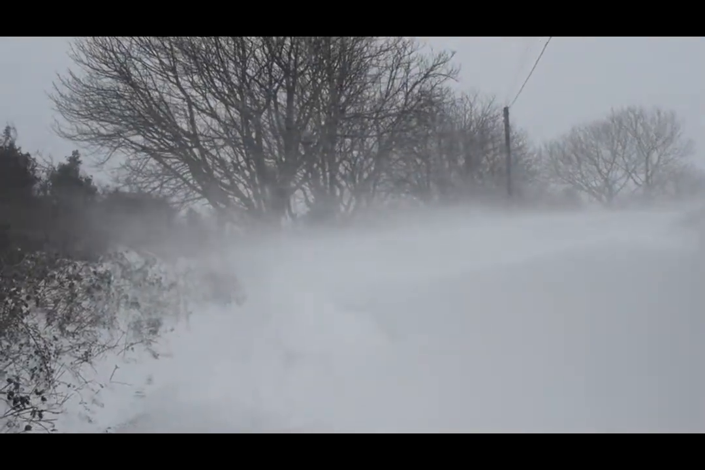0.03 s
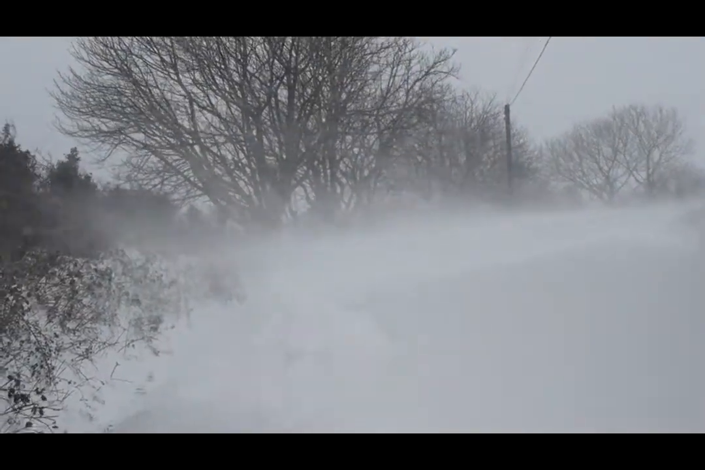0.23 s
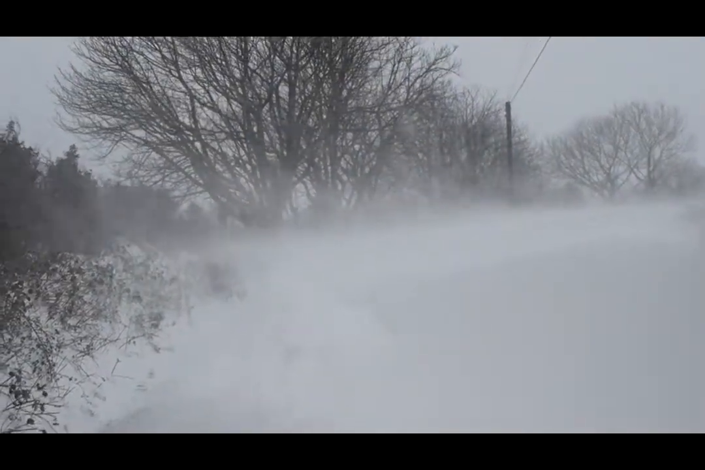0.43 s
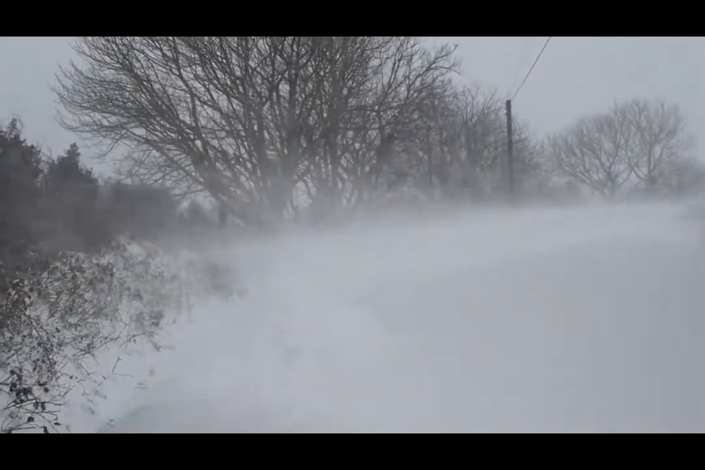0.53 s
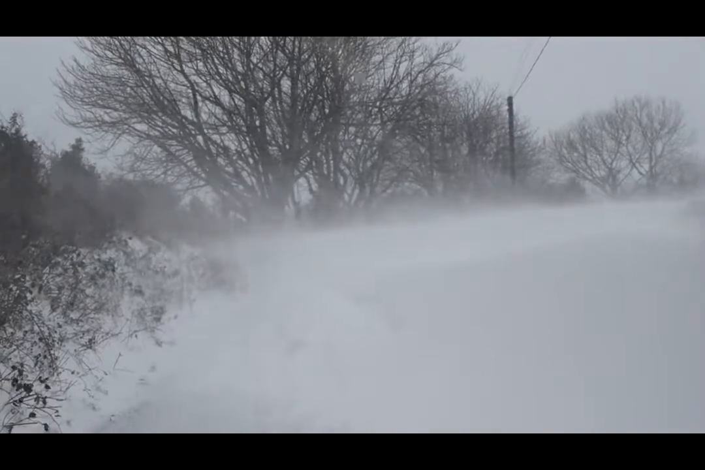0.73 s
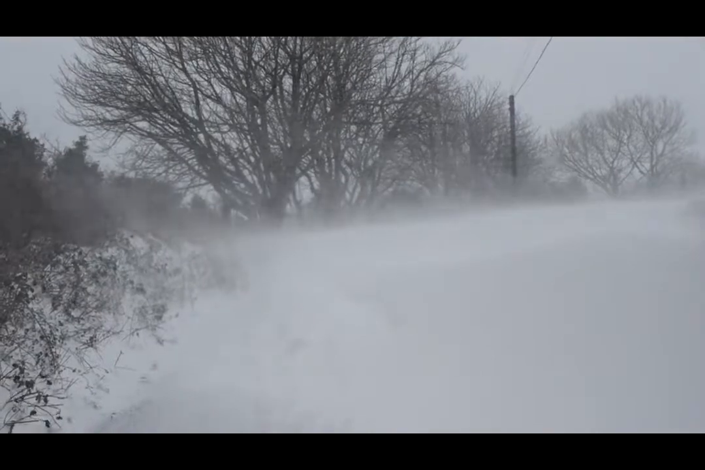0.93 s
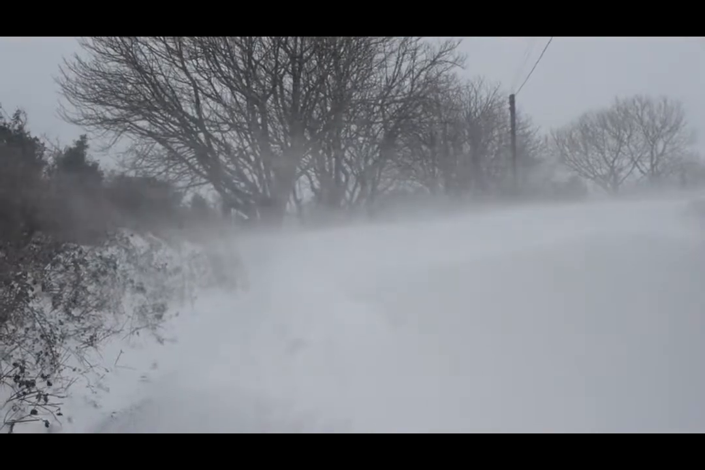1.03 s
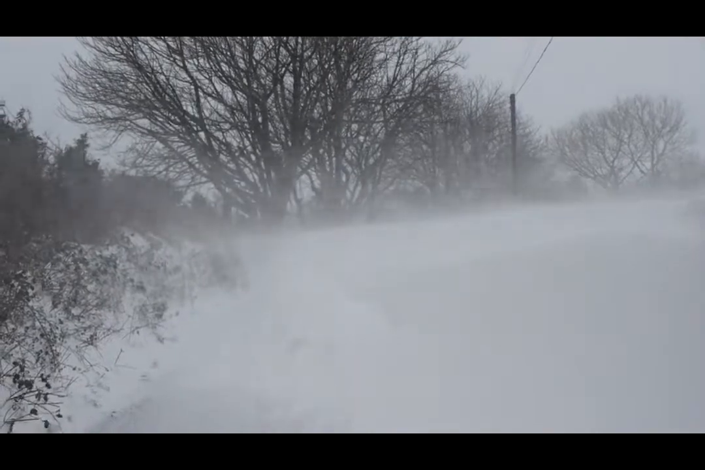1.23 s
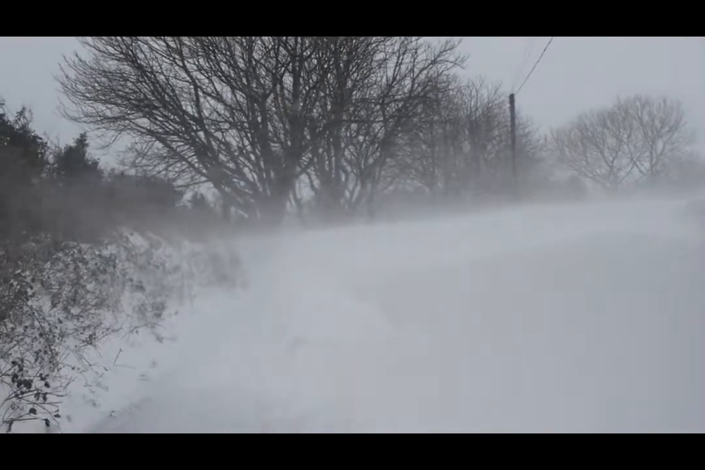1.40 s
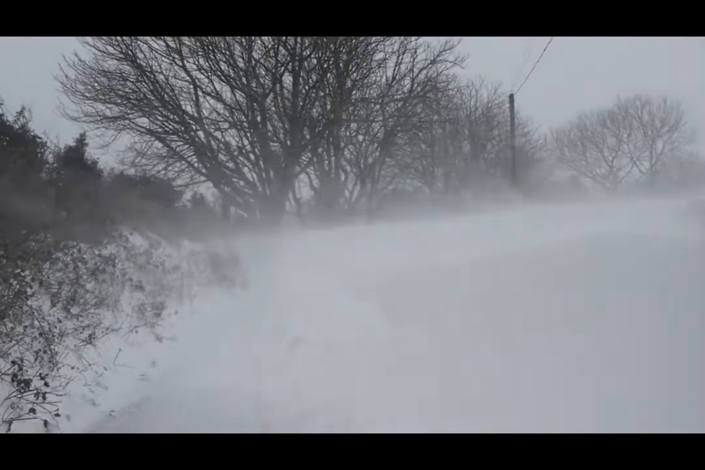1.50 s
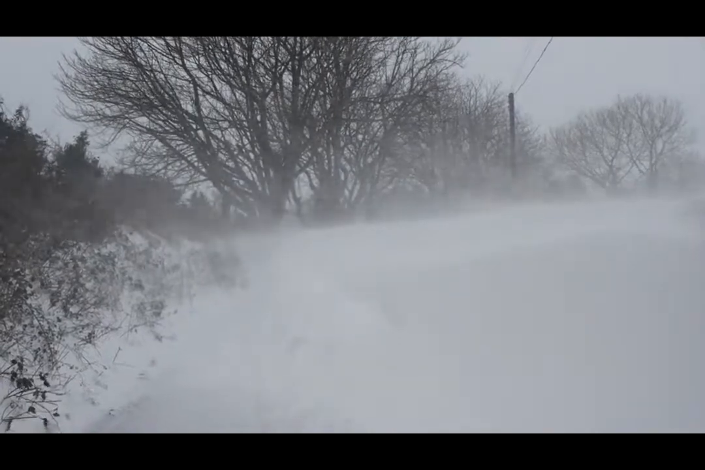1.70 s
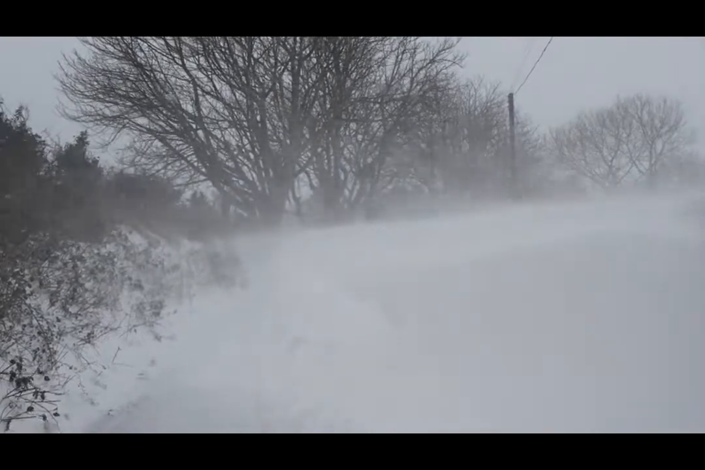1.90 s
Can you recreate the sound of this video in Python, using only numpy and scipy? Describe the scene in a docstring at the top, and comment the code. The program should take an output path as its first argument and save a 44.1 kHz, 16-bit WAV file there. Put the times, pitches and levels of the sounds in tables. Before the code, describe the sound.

Wind buffeting, harsh and distorted, slaps the right side hardest, with thin snowy hiss behind

```python
"""A snowy country road: gusts hit the two ports of a camera microphone, the right one much harder.
Banded noise makes the eddies: a rumble in a light flow, a tearing flutter that overloads in a strong one.
Damped swings slap the ports, and random impulses crack in the fastest flow.
Behind them, wind in bare trees and blowing snow hiss as coloured noise and fine ticks; the hiss sinks
through much of the gusting. Short bright noise bursts are snow spattering on the camera."""
import sys
import numpy as np
from scipy import signal
from scipy.fft import rfft, irfft
from scipy.io import wavfile
from scipy.ndimage import uniform_filter1d

SR = 44100
rng = np.random.default_rng(int(sys.argv[2]) if len(sys.argv) > 2 else 0)


def materialize(psi):
    """Save the field psi as 16-bit PCM at rate SR to the path in sys.argv[1].

    A 1-D psi becomes a single channel; in a 2-D psi each row is a channel.
    """
    bounded = np.clip(np.atleast_2d(psi).T, -1, 1)
    quanta = np.round(bounded * 32767).astype(np.int16)
    wavfile.write(sys.argv[1], SR, quanta)


N = 85995

# Shared level of the tree hiss and snow ticks: (time [s], level [dB])
HISS_LEVEL = [(0.0, -0.5), (0.12, 0.5), (0.2, 0.1), (0.287, -14), (0.391, -11.5), (0.471, -19),
              (0.543, -20.5), (0.686, -8.5), (0.806, -19), (0.942, -15.5), (1.006, -25), (1.165, -16),
              (1.429, -6.5), (1.572, -11), (1.95, -1)]
# Colour of the wind in the trees: (frequency [Hz], relative level per hertz [dB])
HISS_COLOUR = [(100, -15), (330, -6.5), (450, -9.5), (650, 0), (1000, 2), (1350, -5), (1700, -1.5),
               (2400, -10.5), (3600, -16.5), (5500, -23.5), (7000, -23.5), (8500, -20.5), (11000, -35),
               (15000, -32)]
# Colour of a snow tick: (frequency [Hz], relative level [dB])
SNOW_COLOUR = [(1000, -30), (3000, 9), (6000, -3), (8500, 2), (12000, -6), (16000, -23)]
# Spatters of snow blown against the camera: (time [s], right-port level [dB], decay [s])
SPATTERS = [(0.329, -21, 0.00093), (.384, -34.5, 0.017), (.872, -44, 0.03), (1.123, -45.5, 0.053),
            (1.328, -33.5, .002), (1.484, -40.5, 0.11), (1.508, -34, 0.0013), (1.59, -37, 0.0033)]
# Colour of a spatter: (frequency [Hz], relative level [dB])
SPATTER_COLOUR = [(1000, -25), (4000, -6.5), (8500, 3.5), (12000, -3.5), (16000, -13)]
# Colour of a pressure crack: (frequency [Hz], relative level [dB])
CRACK_COLOUR = [(300, -1), (1500, 0.5), (3000, -4.5), (5000, -9.5), (9000, -20.5), (16000, -33)]
# Airflow at each port: (time [s], pressure level before trims [dB], rate of the fastest eddies [Hz])
FLOW_LEFT = [(0.0, -38, 300), (0.295, -27.5, 280), (0.327, -18.5, 300), (0.431, -30.4, 380),
             (0.471, -44, 270), (0.535, -30.5, 280), (0.567, -49, 320), (0.592, -24.5, 383),
             (0.623, -45, 280), (0.694, -39, 240), (0.733, -24.0, 394), (0.83, -39, 340),
             (1.054, -36.5, 340), (1.133, -50.5, 220), (1.189, -41, 400), (1.245, -34.5, 300),
             (1.389, -29, 344), (1.445, -45, 220), (1.548, -21.5, 560), (1.652, -25, 604),
             (1.74, -40.5, 219), (1.765, -17, 297), (1.804, -45, 290), (1.859, -21, 326), (1.892, -36, 221),
             (1.95, -20.5, 450)]
FLOW_RIGHT = [(0, -25, 286), (0.15, -20.6, 237), (0.184, -16, 345), (0.203, 0.7, 400), (0.23, -7, 750),
              (0.246, -0.9, 1450), (0.283, -4, 1473), (0.314, -4.5, 787), (0.345, -13, 690),
              (0.362, -0.2, 1160), (0.377, -12, 1350), (0.381, -12.5, 870), (0.418, -11, 625),
              (0.426, -9, 990), (0.454, -4, 1870), (0.456, -17, 1410), (0.483, -15, 630), (0.53, -46, 250),
              (0.58, -44, 300), (0.63, -18, 330), (0.691, -23.5, 350), (0.704, -1.5, 1240),
              (0.739, -2.5, 1500), (0.789, -2, 1800), (0.795, -14, 1670), (0.812, -13.5, 970),
              (0.819, -18.5, 300), (0.853, -22, 350), (0.897, -5, 556), (0.903, -1, 990), (0.925, -6, 1450),
              (0.957, -6.5, 1250), (0.968, -21.5, 585), (1.022, -29, 242), (1.049, -16, 370),
              (1.11, -19.5, 463), (1.14, -23, 310), (1.158, -20, 447), (1.199, -29.5, 300),
              (1.27, -37, 190), (1.312, -15.5, 394), (1.333, -9, 740), (1.355, -6.5, 460),
              (1.392, -29.5, 270), (1.423, -30, 190), (1.468, -1, 600), (1.494, -10, 627),
              (1.536, -13, 463), (1.567, -5.5, 402), (1.584, -13, 363), (1.621, -14, 530),
              (1.66, -31.5, 240), (1.8, -31.5, 366), (1.9, -24.5, 286), (1.95, -32, 350)]
# Response of either port to turbulence: (frequency [Hz], gain [dB])
PORT_RESPONSE = [(20, -30), (45, -15.5), (80, -1.5), (150, 4), (250, -2.5), (380, 2.5), (480, -2.5),
                 (750, 2.5), (1050, 4), (1350, -4), (1800, 5.5), (3000, 1), (12000, -4)]
# Single sharp eddies that slap a port:
# (time [s], level [dB], central swing rate [Hz], decay [s], port [0 left, 1 right])
SLAPS = [(0.2126, 11.5, 650, 0.0035, 1), (0.2487, -2, 1700, .001, 1), (.375, 6, 1086, 0.00095, 1),
         (0.421, -2, 913, 0.0027, 1), (0.444, -6, 1597, 0.0013, 1), (0.4518, 5.5, 1895, 0.00085, 1),
         (0.641, -6, 450, 0.0018, 1), (0.7029, 0.5, 927, 0.0018, 1), (.859, -4, 458.6, 0.00088, 1),
         (0.9004, 9.5, 600.5, 0.0013, 1), (0.9586, 9.5, 1396, 0.00068, 1), (0.9883, 2, 798.6, 0.0011, 1),
         (1.051, 0, 1250, 0.0021, 1), (1.054, -0.5, 200, 0.0035, 1), (1.156, -12, 800, 0.0033, 1),
         (1.296, -5, 396.5, 0.0033, 1), (1.3321, 7.5, 700, 0.0011, 1), (1.4647, 4.5, 950, 0.0036, 1),
         (1.4898, -2, 784, 0.0011, 1), (1.524, -5.5, 950, 0.0011, 1), (1.622, -8.5, 550, 0.0023, 1),
         (1.561, -0.5, 443.7, 0.0044, 0), (1.605, -2, 500, 0.0048, 0), (1.656, -2.5, 400.6, 0.0028, 0),
         (1.684, -4.5, 250, 0.0055, 0), (1.765, -17, 203, 0.0086, 0)]

# Hiss and ticks; the levels are relative to HISS_LEVEL
HISS_LEFT_DB, HISS_RIGHT_DB = -26.5, -25.5
HISS_SAME = 0.49  # share of the noise power common to both ports, before patchiness
HISS_PATCH_DB, HISS_PATCH_HZ = 2.5, 6.1  # uneven patches in each band
SNOW_PER_S, SNOW_DB, SNOW_SPREAD_DB = 1300, -36.5, 1.5  # grains ticking on the camera

SPATTER_LEFT_DB = -4  # left port relative to the right
RISE_S = 0.00019  # onset of every spatter and slap

# Cracks
CRACKS_PER_S, CRACK_DB = 400, -3.5  # highest rate; level relative to the flow pressure
CRACK_FROM_HZ = 1050  # eddy rate at which the cracking sets in
CRACK_FULL_DB = -14  # below this pressure level the cracks thin out

# Turbulence
LEFT_DB, RIGHT_DB = 1, -1  # trims on the buffeting alone
EDDY_SHIFT = 0.81  # roll-off corner as a share of the eddy rate
EDDY_SLOPE, EDDY_KNEE = 4.98, 5.3  # exponent of the fall in power; sharpness of the corner
FLUTTER_HZ, FLUTTER_DB = 75.6, 4.5  # uneven puffs in a slow flow, before levelling
STEADY_HZ = 1400  # the puffs even out as the eddies near and pass this rate
CRACKLE_HZ, CRACKLE_DB = 270, 7  # the smallest eddies arrive in brief clumps
CRACKLE_ABOVE_HZ = 2000  # half of the clumping depth is reached here

# Slaps
SLAP_JITTER = 0.6  # rms wander of the swing rate, as a share of it
SLAP_PUSH, PUSH_S = 0.24, 0.0014  # one-sided thud: share of the slap level; decay in s

# Overload and band limit
OVERLOAD_KNEE = 24  # the higher, the harder the flattening
CUTOFF_HZ = 15700


def amp(db):
    """Decibels to gain."""
    return 10 ** (np.asarray(db) / 20)


def unit(x):
    """Scales to rms 1."""
    return x / np.sqrt(np.mean(x ** 2) + 1e-20)


def along(rows):
    """Draws each column of a timed table as a curve, sample by sample."""
    s, *columns = np.transpose(rows)
    return [np.interp(np.arange(N) / SR, s, column) for column in columns]


def colour(points, hz):
    """Gain of a spectrum table at hz, joined up along log frequency."""
    f, db = np.transpose(points)
    return amp(np.interp(np.log(hz + 1), np.log(f + 1), db))


def tinted(x, points):
    """Filters x by a spectrum table and scales it to rms 1."""
    gain = colour(points, np.fft.rfftfreq(N, 1 / SR))
    return unit(irfft(rfft(x) * gain, N))


def wander(hz):
    """Smooth random motion of rms 1: noise that rolls off around hz."""
    lowpass = np.exp(-(np.fft.rfftfreq(N, 1 / SR) / hz) ** 2)
    return unit(irfft(rfft(rng.standard_normal(N)) * lowpass, N))


def bands(x, count):
    """Splits x into overlapping bands that sum to x: (centre Hz, band)."""
    centres = np.geomspace(20, 16000, count)
    spectrum = rfft(x)
    log_f = np.log(np.fft.rfftfreq(N, 1 / SR) + 1)
    return [(hz, irfft(spectrum * np.interp(log_f, np.log(centres), peak), N))
            for hz, peak in zip(centres, np.eye(count))]


def strike(s, decay):
    """Envelope of a sudden hit: it jumps at s and dies away exponentially."""
    age = np.maximum(np.arange(N) / SR - s, 0)
    return (1 - np.exp(-(age / RISE_S) ** 2)) * np.exp(-age / decay)


def hiss():
    """Wind in the trees as patchy turbulent noise, and snow grains as random tiny impacts."""
    shared = rng.standard_normal(N)
    ports = []
    for db in (HISS_LEFT_DB, HISS_RIGHT_DB):
        air = np.sqrt(HISS_SAME) * shared + np.sqrt(1 - HISS_SAME) * rng.standard_normal(N)
        air = sum(band * amp(HISS_PATCH_DB * wander(HISS_PATCH_HZ)) for _, band in bands(air, count=14))
        landings = rng.random(N) < SNOW_PER_S / SR
        sizes = amp(SNOW_SPREAD_DB * np.minimum(rng.exponential(1, N), 5))
        grains = landings * sizes * rng.choice([-1, 1], N)
        ports.append(amp(db) * tinted(air, HISS_COLOUR) + amp(SNOW_DB) * tinted(grains, SNOW_COLOUR))
    return np.array(ports) * amp(along(HISS_LEVEL)[0])


def spatters():
    """Clusters of snow impacts blur into short bright noise bursts, stronger on the right."""
    burst = sum(amp(db) * strike(s, decay) for s, db, decay in SPATTERS)
    return np.array([gain * burst * tinted(rng.standard_normal(N), SPATTER_COLOUR)
                     for gain in (amp(SPATTER_LEFT_DB), 1)])


def cracks(flow):
    """Abrupt pressure jumps that crowd in with fast eddies and grow with the pressure."""
    level_db, eddy_hz = along(flow)
    chance = CRACKS_PER_S / SR / (1 + (CRACK_FROM_HZ / np.maximum(eddy_hz, 1)) ** 10)
    chance /= 1 + amp(CRACK_FULL_DB - level_db) ** 2
    jumps = (rng.random(N) < chance) * rng.choice([-1, 1], N) * amp(level_db)
    shape = colour(CRACK_COLOUR, np.fft.rfftfreq(N, 1 / SR))
    # Dividing by the mean gain sets the height of a lone crack
    return amp(CRACK_DB) * irfft(rfft(jumps) * shape / shape.mean(), N)


def slaps():
    """Each sharp eddy pushes on the port and swings the pressure a few uneven times."""
    ports = np.zeros((2, N))
    for s, db, hz, decay, port in SLAPS:
        turns = np.cumsum(hz * (1 + SLAP_JITTER * wander(hz))) / SR
        swing = strike(s, decay) * np.sin(2 * np.pi * turns)
        push = SLAP_PUSH * strike(s, PUSH_S)
        ports[int(port)] += amp(db) * (swing - push)
    return ports


def buffeting(flow):
    """Turbulent pressure at one port: its level and fastest eddies follow the flow."""
    level_db, eddy_hz = along(flow)
    corner_hz = EDDY_SHIFT * np.maximum(eddy_hz, 1)
    clumps = wander(CRACKLE_HZ)
    pressure = np.zeros(N)
    for hz, band in bands(rng.standard_normal(N), count=32):
        roll_off = (1 + (hz / corner_hz) ** EDDY_KNEE) ** (-EDDY_SLOPE / EDDY_KNEE / 2)
        crackle_db = CRACKLE_DB / (1 + (CRACKLE_ABOVE_HZ / hz) ** 2)
        pressure += band * colour(PORT_RESPONSE, hz) * roll_off * unit(amp(crackle_db * clumps))
    pressure *= amp(FLUTTER_DB * wander(FLUTTER_HZ) / (1 + (eddy_hz / STEADY_HZ) ** 2))
    # Level out the slow swells (two 16 ms averages) so the flow table sets the loudness
    power = uniform_filter1d(uniform_filter1d(pressure ** 2, size=700), size=700)
    return amp(level_db) * pressure / np.sqrt(abs(power) + 1e-14)


def scene():
    """Hiss and snow at the back, wind on the left and right ports in front."""
    background = hiss() + spatters()
    wind = np.array([amp(db) * buffeting(flow) + cracks(flow)
                     for db, flow in ((LEFT_DB, FLOW_LEFT), (RIGHT_DB, FLOW_RIGHT))])
    return background + slaps() + wind


def record(dry):
    """The strongest gusts flatten at full scale; then a steep low-pass limits the band."""
    clipped = dry / (1 + abs(dry) ** OVERLOAD_KNEE) ** (1 / OVERLOAD_KNEE)
    lowpass = signal.firwin(511, CUTOFF_HZ, window=("kaiser", 9), fs=SR)
    return signal.oaconvolve(clipped, lowpass[None], "same")


dry = scene()
out = record(dry)
materialize(out)
```